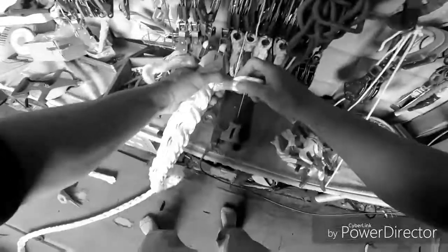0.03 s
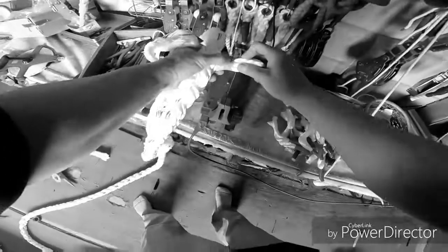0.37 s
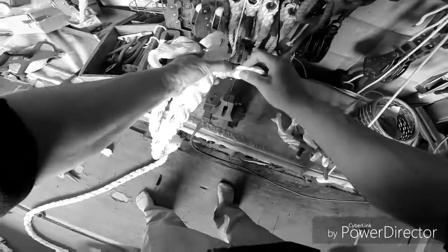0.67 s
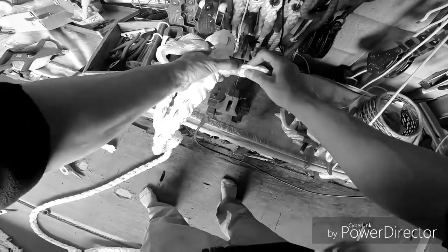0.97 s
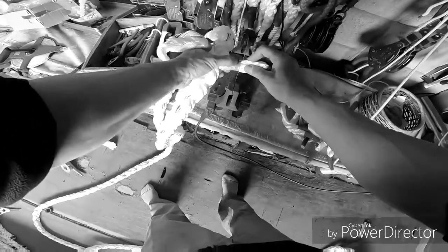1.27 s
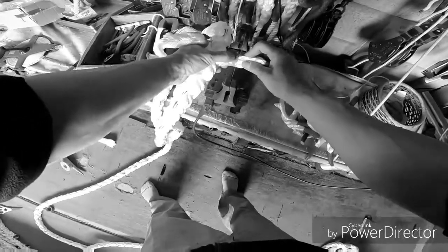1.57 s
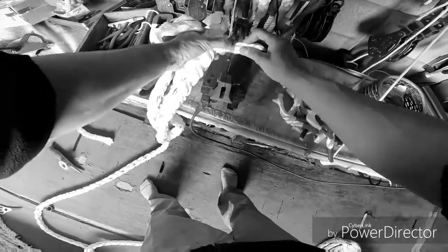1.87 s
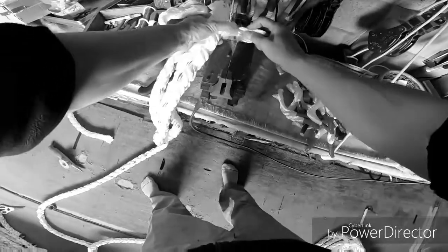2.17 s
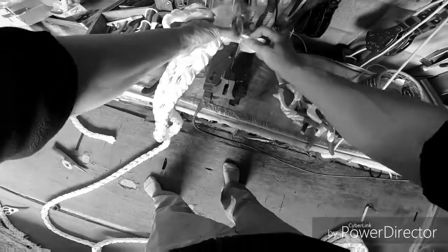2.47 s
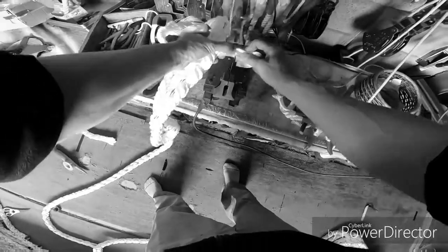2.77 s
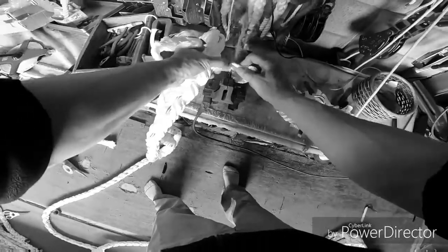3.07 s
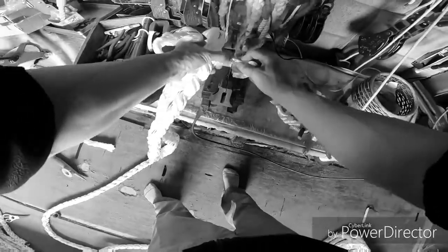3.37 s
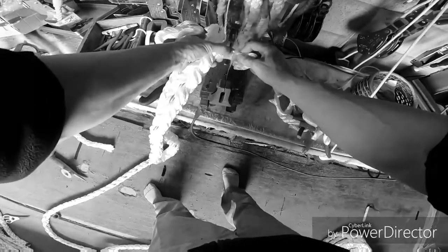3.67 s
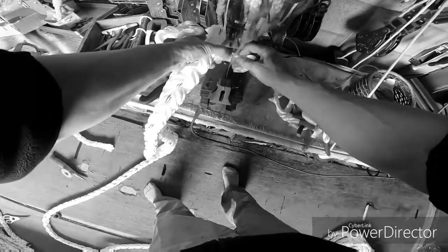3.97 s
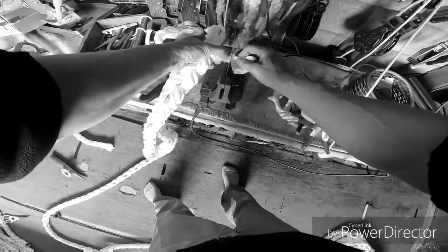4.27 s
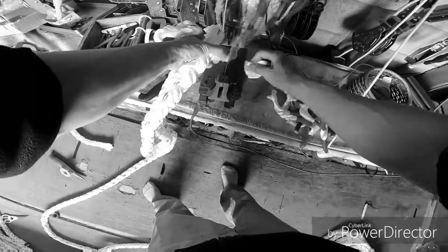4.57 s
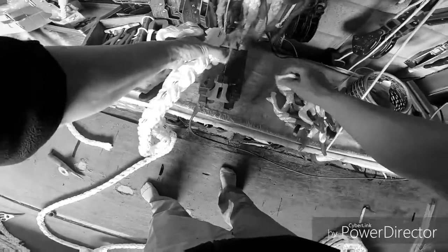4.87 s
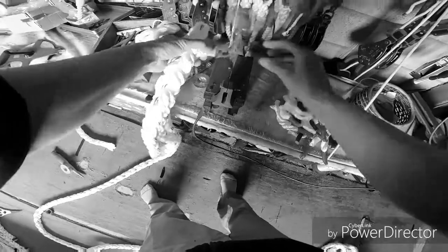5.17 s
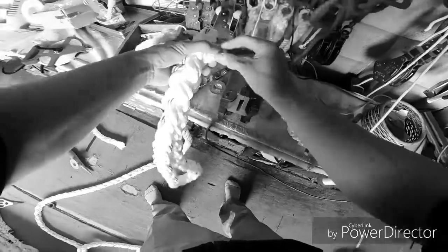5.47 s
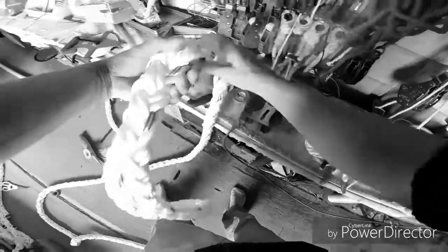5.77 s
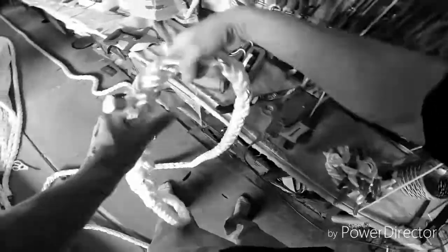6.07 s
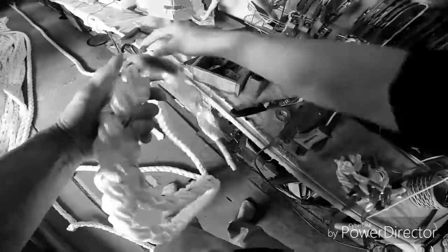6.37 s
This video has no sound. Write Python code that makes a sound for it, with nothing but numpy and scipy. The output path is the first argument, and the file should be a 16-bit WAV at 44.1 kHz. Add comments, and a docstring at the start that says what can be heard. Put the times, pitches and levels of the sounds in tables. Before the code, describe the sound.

Thick fibre rope is worked by hand, close and quiet, in a small workshop. A faint motor hum and a low rumble with soft, irregular thuds run throughout. It opens with a dry scuff and a tiny squeak, followed by soft knocks on the wooden bench at about 0.5 and 0.9 seconds. From 1.7 to 2.4 seconds the strands hiss and crunch as they tighten, with a dull thump at 2.2. Faint squeaks and light scraping follow, then a knock near 3.8 seconds. After a short lull, a double knock comes at 5.1 seconds, and sharp little ticks at about 5.3 and 5.6. From 5.8 seconds the rope rustles and crunches more strongly, scraping and bumping across the wood around 6.4 seconds, with one last light knock just after.

```python
"""A close, dry hiss and crunch of thick fibre rope, spliced by hand at a wooden workbench.
Fibres hiss as they slide and squeak when they slip evenly; strands crunch as they tighten.
Rope and hands scuff and knock on the bench and set its wood ringing, with small ticks in between.
Behind it a motor hums in the quiet workshop, over a low rumble that comes in soft thuds."""
import sys
import numpy as np
from scipy import signal
from scipy.fft import rfft, irfft, next_fast_len
from scipy.io import wavfile
from scipy.ndimage import uniform_filter1d, map_coordinates

SR = 44100
rng = np.random.default_rng(int(sys.argv[2]) if len(sys.argv) > 2 else 0)


def put_to_file(sound):
    """Save the sound as 16-bit audio at rate SR, in the file named by the first command-line argument."""
    columns = np.atleast_2d(sound).T  # one column per channel
    safe = np.clip(columns, -1, 1)
    whole_steps = np.round(safe * 32767)
    wavfile.write(sys.argv[1], SR, whole_steps.astype(np.int16))


N = 292356
T = np.arange(N) / SR

# the bench's low thump modes and higher woody modes: (pitch [Hz], width [Hz], gain [dB])
THUMP_MODES = [(116.9, 14.4, -1), (161, 12.3, -4.5), (204.2, 32.5, 1), (243, 15.6, -0.5)]
WOOD_MODES = [(265, 18, -12), (334, 37, 1), (384, 77, 5), (470, 112, 5.5), (596, 91, -6), (689, 34, 1.5),
              (771, 42, 0), (875, 48, -4.5), (1085, 33, 6.5), (1260, 120, -1.5)]
# tone of rope rasping on wood: (frequency [Hz], gain [dB])
RASP_TONE = [(300, -1.5), (800, 2.5), (1500, 1.5), (2200, -5), (3000, -16.5), (5000, -44), (12000, -65)]
# pulls on the strands: (start [s], rise [s], hold [s], release [s], hiss [dB], crunch [dB])
ROPE_PULLS = [(0.0, 0.0033, 0.051, 0.22, -68.5, -56), (.17, 0.042, 0.025, 0.1, -73, -62),
              (.3, 0.061, 0.11, .1, -87, -70.5), (.485, 0.015, .015, 0.092, -80, -63.5),
              (.86, 0.017, 0.018, 0.067, -87, -66), (1.21, 0.017, 0.011, 0.063, -73.5, -62),
              (1.635, 0.01, 0.016, 0.13, -83, -70.5), (1.75, .025, .04, .1, -79, -66),
              (1.70, 0.22, 0.28, 0.14, -61, -55.5), (1.912, .02, .01, 0.069, -65, -56),
              (2.14, 0.042, 0.012, 0.14, -62, -53.5), (2.28, 0.14, 0.052, 0.19, -71, -63.5),
              (2.62, 0.08, 0.33, 0.052, -81.5, -68), (3.02, .17, .5, .33, -78.5, -74.5),
              (3.835, 0.016, 0.012, 0.16, -77, -72), (4.07, 0.017, .01, 0.067, -77.5, -81),
              (4.36, 0.027, .008, 0.031, -72, -71), (4.78, 0.094, 0.061, .25, -66, -71.5),
              (5.035, .055, 0.034, 0.09, -58.5, -79), (5.2, 0.058, 0.23, .1, -88, -77.5),
              (5.44, 0.025, .008, 0.06, -70.5, -67), (5.53, 0.028, 0.0069, 0.028, -70, -55.5),
              (5.4, 0.22, 0.31, 0.37, -75.5, -69.5), (5.835, 0.047, 0.018, 0.073, -66, -51),
              (5.87, 0.064, 0.022, 0.19, -62, -50.5), (6.17, 0.039, 0.0079, 0.037, -61, -45.5),
              (6.13, 0.15, 0.15, .15, -57, -53), (6.32, 0.048, 0.016, 0.071, -48.5, -48),
              (6.52, 0.095, 0.074, 0.11, -64, -56.5)]


def amp(db):
    """Decibels to gain."""
    return 10 ** (np.asarray(db) / 20)


def unit(x):
    """Scale to rms 1."""
    return x / np.sqrt(np.mean(x ** 2) + 1e-20)


def colour(x, points, depth=1):
    """EQ by a curve of (frequency [Hz], gain [dB]) points; depth scales the curve."""
    hz, db = np.transpose(points)
    size = next_fast_len(x.shape[-1])
    bins_hz = np.maximum(np.fft.rfftfreq(size, 1 / SR), 1)
    gain = amp(depth * np.interp(np.log(bins_hz), np.log(hz), db))
    return irfft(rfft(x, size) * gain, size)[..., :x.shape[-1]]


def resonate(x, hz, width):
    """One damped resonance, its width in Hz."""
    return signal.lfilter(*signal.iirpeak(hz, hz / width, SR), x)


def ring(x, modes):
    """A body ringing in all its modes at once."""
    return sum(amp(db) * resonate(x, hz, width) for hz, width, db in modes)


def soften(x, hz):
    """Roll off the treble above hz."""
    return signal.sosfilt(signal.butter(2, hz, fs=SR, output="sos"), x)


def walk(rate):
    """Smooth random wander with a spread near 1, turning rate times a second."""
    size = max(int(SR / rate), 2)
    steps = np.repeat(rng.standard_normal(N // size + 1), size)
    return 1.26 * uniform_filter1d(steps, size)[:N]


def grains(shape, rate, spread_db):
    """Tiny impulses of uneven size at random moments, about rate a second."""
    size = rng.choice([-1, 1], shape) * amp(spread_db * np.clip(rng.standard_normal(shape), -2, 2))
    return unit(size * (rng.random(shape) < rate / SR))


def pair(three, shared):
    """Stereo from one common and two separate signals; shared is the common part of the power."""
    return np.sqrt(shared) * three[0] + np.sqrt(1 - shared) * three[1:]


def add(out, time, sound):
    """Mix a sound in at a time in seconds."""
    start = int(time * SR)
    out[:, start:start + sound.shape[-1]] += sound[:, :N - start]


def strokes(rows, column):
    """Envelope of hand strokes at the level in column: each builds up, holds and dies away."""
    power, edge_db = 0, -20  # level at the start of the rise and the end of the release
    for row in rows:
        start, rise, hold, release = row[:4]
        building = np.maximum(start + rise - T, 0) / rise
        easing = np.maximum(T - start - rise - hold, 0) / release
        power = power + amp(row[column] + edge_db * np.minimum(building + easing, 10)) ** 2
    return np.sqrt(power)


def rumbling():
    """A deep rumble swells in soft, irregular thuds and drops into one brief lull."""
    # swells of the rumble: (time [s], level [dB])
    thuds = [(.2, -58), (.53, -57), (.71, -52), (.81, -50.5), (.92, -48), (1.1, -58), (1.28, -55),
             (1.49, -53), (1.9, -49.5), (2.05, -58), (2.23, -45.5), (2.44, -56), (2.66, -50.5),
             (2.832, -56), (3.18, -53), (3.4, -59), (3.73, -55.5), (3.93, -49), (4.56, -51.5), (4.7, -54.5),
             (4.9, -54), (5.09, -57), (5.21, -57), (5.76, -53.5), (5.97, -50), (6.37, -50), (6.51, -48.5)]
    pitch_hz, thud_half_s = 51.9, 0.033
    band = resonate(rng.standard_normal(N), pitch_hz, width=15)
    throb = signal.hilbert(resonate(band, pitch_hz, width=16))
    throb = unit(throb.real / np.abs(throb) ** 0.55)  # an even throb with few deep gaps
    swells = sum(amp(db) * np.exp(-((T - time) / thud_half_s) ** 2) for time, db in thuds)
    lull_db = -12 * np.exp(-((T - 4.26) / 0.38) ** 4)
    bed = amp(-64.5 + 1.7 * walk(14) + lull_db)
    return throb * np.hypot(swells, bed)


def workshop():
    """Room tone: still air and a wavering motor hum."""
    # tone of the air: (frequency [Hz], gain [dB])
    air_tone = [(15, -29), (25, 2), (54, 4.5), (92, -12), (141, -0.5), (409, -11), (468, -16), (594, -6),
                (661, -11.5), (840, -11), (1100, -23), (1390, -21.5), (2860, -36.5), (5130, -34),
                (14500, -48)]
    # partials of the motor: (pitch [Hz], level [dB])
    motor_partials = [(119.7, -75.5), (479.1, -81.5), (538.5, -84.5), (598, -80), (717, -89.5),
                      (839, -86.5)]
    noise = rng.standard_normal((3, N))
    bass = soften(noise, 300)
    air = pair(bass, shared=0.35) + pair(noise - bass, shared=0.031)
    air = unit(colour(air, air_tone)) * amp(-65 + 0.34 * walk(3.75))
    hum = 0
    for hz, db in motor_partials:
        level = amp(db + 3.75 * walk(5.1))
        phase = 2 * np.pi * np.cumsum(hz + 2.42 * walk(12)) / SR
        hum = hum + level * np.sqrt(2) * np.sin(phase)
    return air + hum


def room(x, t60, wet_db):
    """Add the short, slightly dull reverb of a small room."""
    t = T[:SR // 2]
    tail = colour(rng.standard_normal((2, len(t))), [(200, 2.0), (4000, -1), (14000, -10.5)])
    tail = unit(tail * amp(-60 * t / t60) * (t > .004)) / np.sqrt(len(t))
    return x + amp(wet_db) * signal.fftconvolve(x, tail, axes=1)[:, :N]


def clutter(x, decay_s, wet_db):
    """Arms, vice and tools close by throw back quick reflections, which shift as the hands move."""
    t, pose = T[:SR // 50], 0.88 * walk(5)
    out = x
    for weight in np.cos(pose), np.sin(pose):
        echoes = grains((2, len(t)), rate=3000, spread_db=2.2) * np.exp(-t / decay_s) * (t > .001)
        echoes = unit(echoes) / np.sqrt(len(t))
        out = out + amp(wet_db) * weight * signal.oaconvolve(x, echoes, axes=1)[:, :N]
    return out / np.hypot(1, amp(wet_db))


def ticking():
    """Small bright ticks and fibre snaps, each a noise burst with one broad resonance."""
    # snaps: (time [s], level [dB], pitch [Hz], decay [s])
    ticks = [(.189, -57.5, 5800, 0.0086), (1.222, -61.5, 4450, 0.015), (3.154, -59.5, 3440, 0.0025),
             (3.176, -64.5, 4600, 0.011), (4.376, -63, 5200, 0.0018), (4.7, -50, 4120, 0.00056),
             (5.2559, -39.5, 2200, 0.0025), (5.449, -60, 3600, .003), (5.462, -52, 1800, 0.0046),
             (5.468, -47, 6000, 0.00049), (5.558, -59, 2500, 0.0074), (5.6386, -37, 3560, 0.0016)]
    out, t = np.zeros((2, N)), T[:SR // 5]
    for time, db, hz, decay in ticks:
        noise = pair(rng.standard_normal((3, len(t))), shared=0.35)
        burst = soften(resonate(noise, hz, width=0.69 * hz), 1.58 * hz)
        add(out, time, amp(db) * unit(burst) * np.exp(-t / max(decay, .0005)))
    return out


def at_bench(low, wood, rasp):
    """Pan the bench: its wood is louder and a little earlier on the right, its low end stays centred."""
    # left-side EQ, mirrored at about half depth on the right: (frequency [Hz], gain [dB])
    pan_curve = [(100, -4), (380, 0), (600, -0.5), (800, -5.5), (1300, -2), (2300, -2.5), (4200, 1)]
    t, left_delay_s = T[:len(wood)], .00026
    left, right = np.array([np.interp(t - left_delay_s, t, wood), wood]) + rasp
    return low + np.array([colour(left, pan_curve), colour(right, pan_curve, depth=-0.52)])


def scuffing():
    """Rope dragged over the bench rasps and keeps the wood shaking."""
    # drags: (start [s], rise [s], hold [s], release [s], wood and rasp [dB], low judder [dB])
    scuffs = [(0.0, 0.0037, 0.07, 0.32, -53.5, -63.5), (.2, 0.017, 0.015, 0.49, -60.5, -80),
              (.36, .09, 0.041, .05, -61.5, -60.5), (1.85, 0.063, 0.034, .06, -65, -52.5),
              (1.8, 0.063, 0.35, 0.09, -55.5, -61), (2.35, 0.11, 0.5, 0.086, -73, -74.5),
              (2.93, 0.06, 0.033, 0.16, -63, -64), (3.1, 0.13, 0.24, 0.11, -58, -56.5),
              (3.6, 0.041, 0.044, 0.51, -64, -64.5), (3.93, 0.036, 0.012, 0.042, -55, -67),
              (4.03, 0.055, 0.098, .19, -62, -59), (4.62, 0.07, 0.45, .1, -65, -71.5),
              (5.3, 0.22, 0.37, 0.13, -65.5, -68), (5.85, 0.033, 0.017, 0.32, -61, -55),
              (6.3, 0.095, 0.049, .11, -44.5, -56), (6.585, 0.026, .015, .08, -56, -58)]
    slips = soften(grains(N, rate=1500, spread_db=2.1) * amp(2 * walk(40)), 1200)
    drag, press = strokes(scuffs, column=4), strokes(scuffs, column=5)
    rasp = amp(-7.5) * unit(colour(grains((2, N), rate=3000, spread_db=3.8), RASP_TONE))
    judder = amp(1.5) * unit(resonate(ring(slips, THUMP_MODES), hz=163.5, width=30.5))
    wood = amp(-2.5) * unit(resonate(ring(slips, WOOD_MODES), hz=550, width=340))
    return at_bench(judder * press, wood * drag, rasp * drag)


def knocking():
    """Soft blows ring the bench, each with a chatter of smaller contacts as the rope settles."""
    # blows: (time [s], wood [dB], wood pitch [Hz], thump [dB], thump pitch [Hz], rasp [dB], settle [s])
    knocks = [(.493, -44.5, 685, -51.5, 170, -51.5, 0.038), (.867, -45.5, 810, -60, 187, -47, 0.024),
              (.880, -43.5, 690, -49.5, 181, -48, 0.036), (1.891, -52, 450, -46.5, 181, -78, 0.035),
              (1.926, -46.5, 490, -63, 197, -67, 0.052), (2.168, -52, 455.2, -43.5, 138, -60, 0.0092),
              (2.178, -46, 448, -33.5, 131, -57, 0.023), (2.230, -56.5, 475, -47, 106, -63, 0.03),
              (3.238, -49.5, 584, -54.5, 171, -69, 0.028), (3.311, -55.5, 543, -64, 176, -82, 0.035),
              (3.644, -60, 524, -55.5, 186, -61, 0.026), (3.846, -41, 660, -39.5, 182, -54, 0.035),
              (3.876, -46.5, 606, -44, 200, -61, 0.017), (5.076, -38, 620, -41, 132, -44.5, 0.034),
              (5.130, -38, 700, -43, 143, -44.5, 0.029), (6.351, -44, 815, -52.5, 131, -43.5, 0.077),
              (6.596, -48.5, 650, -58, 170, -59, 0.044)]
    out, t = np.zeros((2, N)), T[:SR // 3]
    attack = slice(0, SR // 25)  # the first 40 ms set each layer's level
    blow = np.arange(len(t)) == SR // 250  # one impulse, 4 ms in
    for time, wood_db, wood_hz, thump_db, thump_hz, rasp_db, settle in knocks:
        fade = np.exp(-t / settle) * (1 - np.exp(-t / 0.0039))
        chatter = grains(len(t), rate=2500, spread_db=4.9) * fade
        # each blow favours the modes near its pitch: a longer push, lower modes
        thump = resonate(ring(30 * blow + chatter, THUMP_MODES), thump_hz, width=0.21 * thump_hz)
        wood = resonate(ring(8 * blow + chatter, WOOD_MODES), wood_hz, width=0.38 * wood_hz)
        rasp = colour(grains((2, len(t)), rate=4000, spread_db=2.8) * fade, RASP_TONE)
        layers = (thump, thump_db), (wood, wood_db - 2.0), (rasp, rasp_db - 0.5)
        balanced = [amp(db) * x / np.std(x[..., attack]) for x, db in layers]
        add(out, time, at_bench(*balanced))
    return out


def squeaking():
    """For a moment the fibres slip at a nearly even rate and sing, in fits and starts."""
    # fibre on fibre: (middle [s], half length [s], pitch [Hz], level [dB], width [share of pitch])
    squeaks = [(0.036, 0.076, 12100, -78, 0.046), (0.044, 0.057, 1260, -57.5, 0.22),
               (0.207, 0.022, 12000, -74, .05), (.24, 0.044, 1236, -67.5, 0.11),
               (0.512, 0.026, 2096, -58, .05), (2.49, 0.096, 2810, -68.5, .3),
               (2.868, 0.05, 3570, -68, .04), (2.49, .06, 3120, -73, .05), (2.993, .035, 3520, -68, .06),
               (2.95, .08, 2450, -81, .05), (3.392, 0.029, 2080, -62, 0.03),
               (4.395, 0.015, 3190, -66.5, 0.099), (4.39, 0.021, 5360, -69.5, 0.18),
               (4.93, .07, 2490, -75, .1)]
    out, flicker_db = 0, 3
    slips = pair(rng.standard_normal((3, N)), shared=1.0) * amp(flicker_db * walk(70))
    for middle, half, hz, db, width in squeaks:
        tone = resonate(resonate(slips, hz, width * hz), hz, 0.21 * hz)
        out = out + amp(db) * unit(tone) * np.exp(-((T - middle) / half) ** 4)
    return out


def sliding():
    """Countless fibres slip past each other in a fine, uneven hiss."""
    # tone of sliding fibres: (frequency [Hz], gain [dB])
    hiss_tone = [(300, -22), (900, 0.5), (2400, 1.5), (4200, -2.5), (6000, 2.5), (8000, -3), (12500, -8.5),
                 (14500, -23)]
    slips = pair(grains((3, N), rate=7000, spread_db=7.6), shared=0.027) * amp(walk(40))
    effort = np.hypot(strokes(ROPE_PULLS, column=4), amp(-90.5))  # floor: the rope held still
    return unit(colour(slips, hiss_tone)) * effort * amp(3.5)


def crunching():
    """Tightening strands stick and slip in coarse grains; their resonances shift with the tension."""
    # resonances of the strands: (pitch [Hz], width [Hz], gain [dB])
    strand_modes = [(1800, 1600, 3.5), (2450, 900, 5.5), (3070, 230, 4), (3536, 1200, 6), (4930, 770, 8.5)]
    slips = pair(grains((3, N), rate=1500, spread_db=2.2), shared=0.83) * amp(1.35 * walk(70))
    clock = np.cumsum(1 + .04 * walk(7))  # changing tension bends the pitch by about 4 %
    ringing = ring(slips, strand_modes)
    strands = np.array([map_coordinates(side, [clock], mode="mirror") for side in ringing])
    effort = np.hypot(strokes(ROPE_PULLS, column=5), amp(-81.5))  # floor: the rope held still
    return unit(soften(soften(strands, 5460), 5900)) * effort * amp(-2.0)


def scene():
    """The rope work sounds in one small room, over room tone and rumble."""
    fibres = clutter(sliding() + crunching() + ticking(), decay_s=0.0027, wet_db=-4.5)
    work = knocking() + scuffing() + fibres + squeaking()
    return room(work, t60=0.36, wet_db=-19.5) + workshop() + rumbling()


def record(dry):
    """A steep high cut takes off the very top."""
    top_hz = 14400
    return signal.sosfilt(signal.ellip(8, .2, 70, top_hz, fs=SR, output="sos"), dry)


dry = scene()
out = record(dry)
put_to_file(out)
```